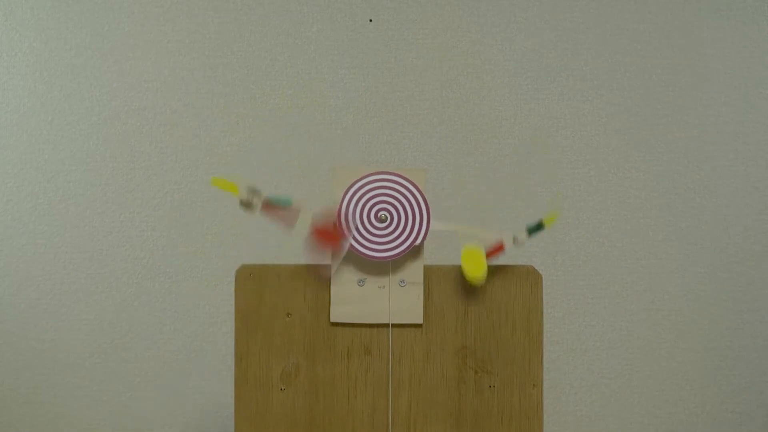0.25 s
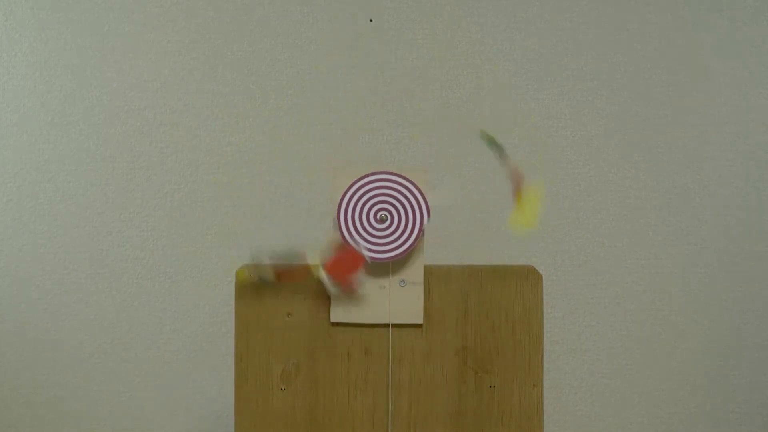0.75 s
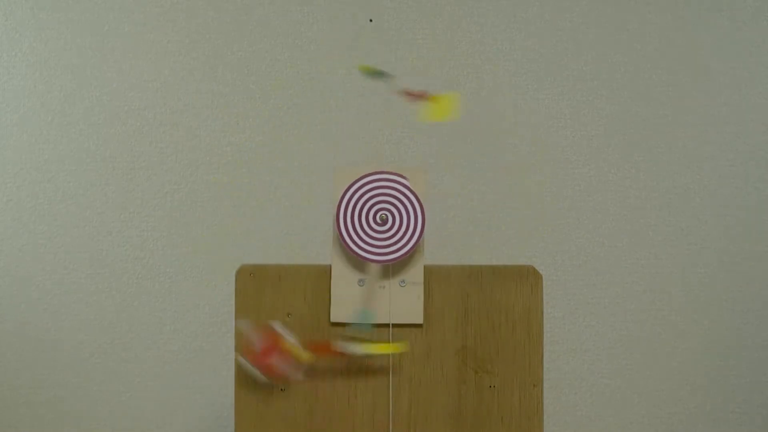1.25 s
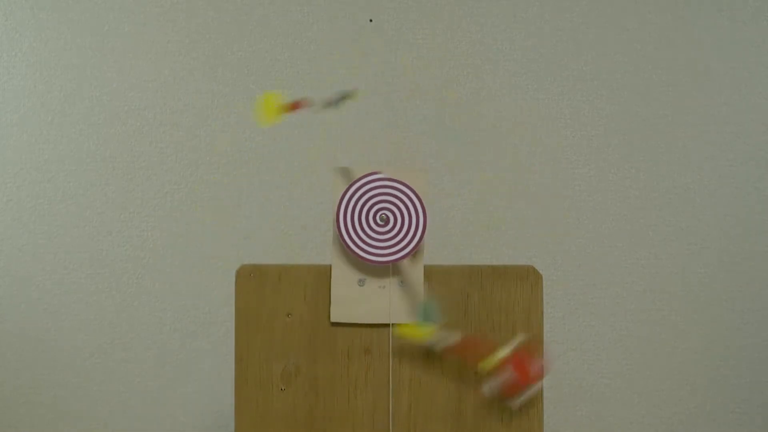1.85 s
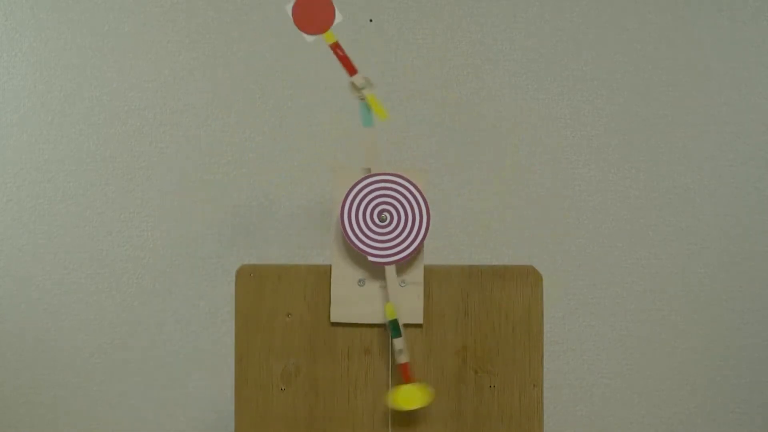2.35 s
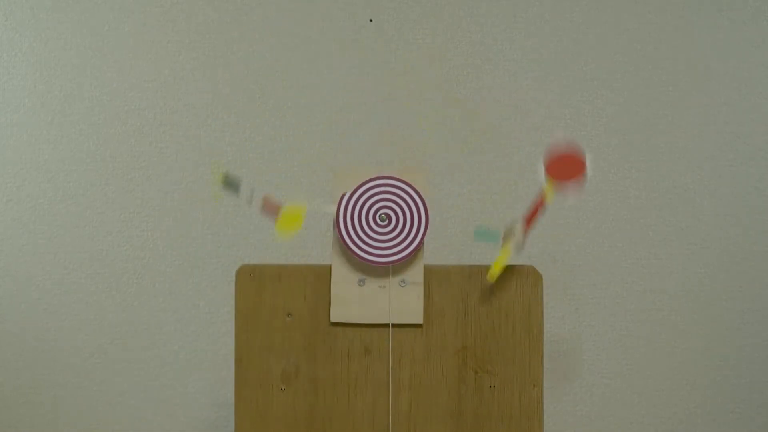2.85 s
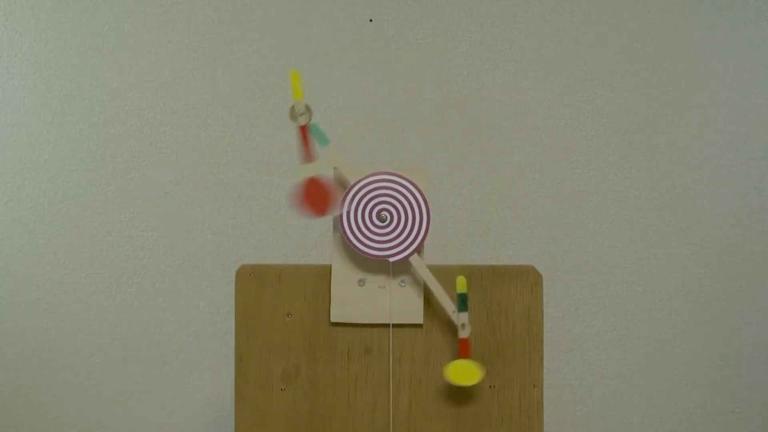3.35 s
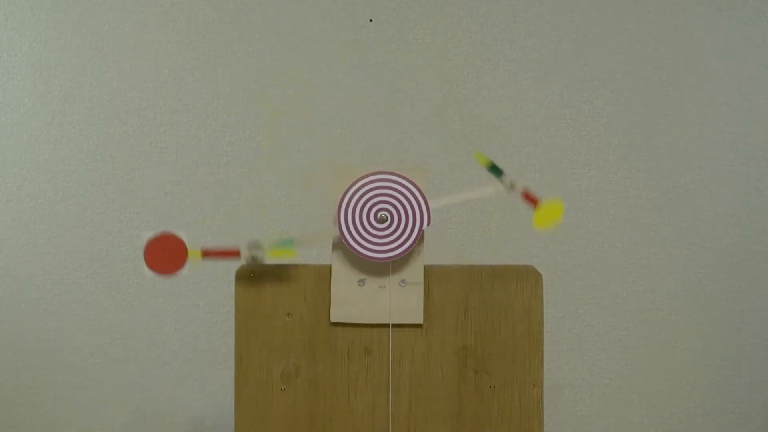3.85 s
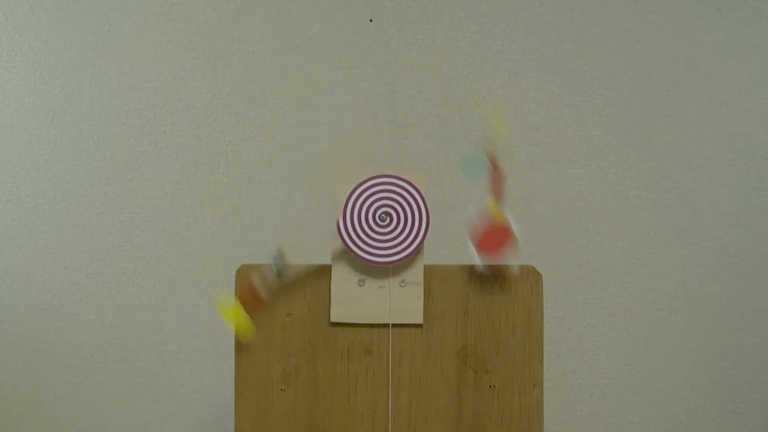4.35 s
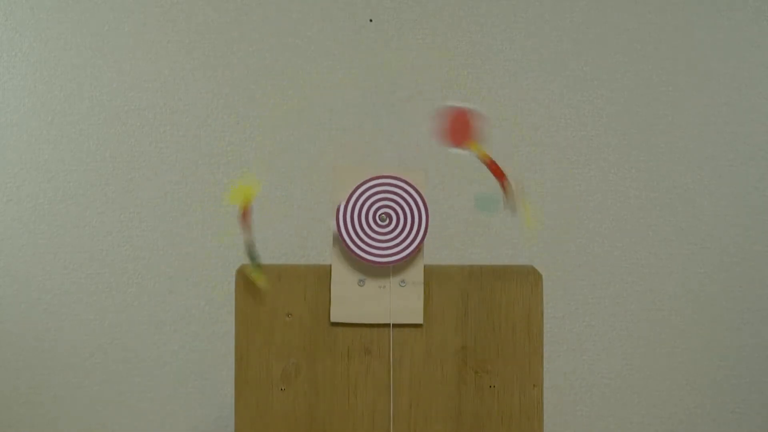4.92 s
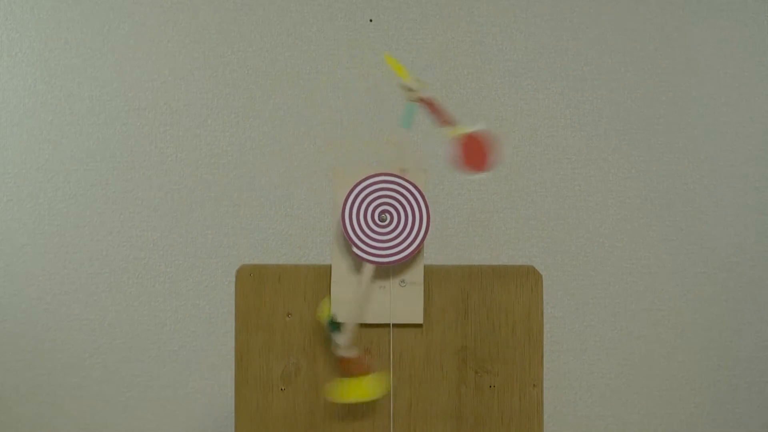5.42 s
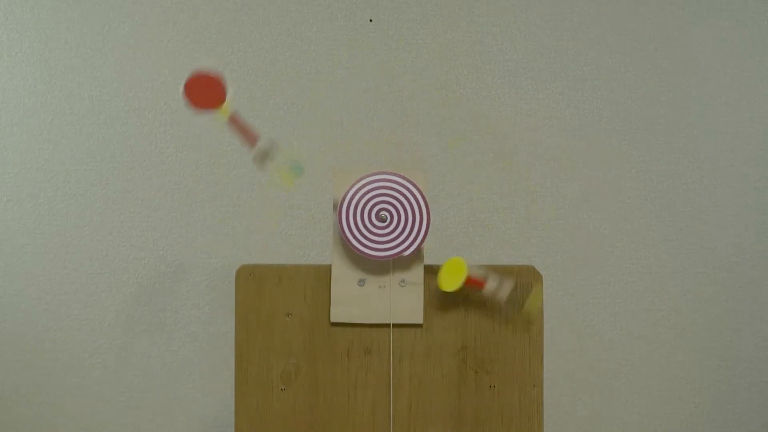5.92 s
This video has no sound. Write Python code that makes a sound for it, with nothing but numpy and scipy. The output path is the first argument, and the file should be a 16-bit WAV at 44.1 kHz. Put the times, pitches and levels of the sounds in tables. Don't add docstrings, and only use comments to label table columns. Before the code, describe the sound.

Loose wooden pivots of a swinging double-pendulum sculpture clack and knock irregularly in a small room, with bright bearing ticks over faint steady hiss.

```python
import sys
import numpy as np
from scipy import signal
from scipy.fft import rfft, irfft, next_fast_len
from scipy.io import wavfile
from scipy.ndimage import uniform_filter1d

SR = 44100
rng = np.random.default_rng(int(sys.argv[2]) if len(sys.argv) > 2 else 0)


def ratio_of_db(decibels):
    return 10 ** (np.asarray(decibels, float) / 20)


def store_pcm(level_fs):
    pcm = np.round(np.clip(level_fs, -1, 1) * 32767).astype(np.int16)
    wavfile.write(sys.argv[1], SR, np.atleast_2d(pcm).T)


N = 272528
SPAN = SR // 3
TIME = np.arange(SPAN // 2) / SR


def unit(x):
    return x / np.sqrt(np.mean(x ** 2) + 1e-20)


def peaked(x):
    return x / np.max(np.abs(x))


def along(points, hz):
    f, v = np.transpose(points)
    return np.interp(np.log(hz + 1), np.log(f + 1), v)


def filtered(x, response):
    m = next_fast_len(N + SR // 2)
    return irfft(rfft(x, m) * response(np.fft.rfftfreq(m, 1 / SR)), m)[..., :N]


def band(x, lo_hz, hi_hz, order=3):
    sos = signal.butter(order, [lo_hz, min(hi_hz, .45 * SR)], "band", fs=SR, output="sos")
    return signal.sosfilt(sos, x)


def add(track, s, sound):
    track[:, round(s * SR):][:, :SPAN] += sound


def build_up(rise_s):
    return 1 - np.exp(-TIME / rise_s)


def ring(modes, scatter_db):
    hz, db, t60 = np.transpose(modes)[..., None]
    strength, detune, phase = rng.standard_normal((3, len(modes), 1))
    waves = np.sin(2 * np.pi * (hz * (1 + 0.0055 * detune) * TIME + phase))
    decay = ratio_of_db(db + scatter_db * strength - 60 * TIME / t60)
    return np.sum(decay * waves, 0) * build_up(0.00013)


def burst(rise_s, lo_hz, hi_hz):
    u = TIME / rise_s
    noise, grain = rng.standard_normal((2, len(u)))
    return u * np.exp(1 - u) * unit(band(noise * ratio_of_db(5.34 * grain), lo_hz, hi_hz))


def chatter(spread_s, count):
    touches = np.zeros(SR // 20)
    delays = spread_s * rng.gamma(2, .5, count) * SR
    places = np.minimum(delays, len(touches) - 1).astype(int)
    touches[places] = rng.standard_normal(count)
    touches[0] = 0.84
    return touches / np.linalg.norm(touches)


def ring_arms(contact_hz):
    # (frequency [Hz], level [dB], T60 [s])
    arm_modes = [(1950, -6, .02), (2190, -2, .05), (2500, -4, .02), (2720, -2, .03), (2870, -1, .04),
                 (3030, -2, .035), (3208, 0, .055), (3540, -5, .02), (3935, -5, .02), (4290, -5, .02),
                 (4700, -9, .02)]
    near = [(hz, db - 18 * abs(np.log2(hz / contact_hz)), t60) for hz, db, t60 in arm_modes]
    driven = signal.fftconvolve(ring(near, 2.8), chatter(.005, count=8))
    return peaked(band(driven[:len(TIME)], 2260, 4940))


def ring_long_arm():
    # (frequency [Hz], level [dB], T60 [s])
    long_modes = [(1235, -9, .04), (1378, -8, .04), (1535, -4, .03), (1565, 0, .05), (1680, -5, .03)]
    return peaked(ring(long_modes, 1.0) * build_up(0.001) ** 2)


def ring_stand():
    # (frequency [Hz], level [dB], T60 [s])
    stand_modes = [(415.5, -4, 0.067), (453.6, 0.5, 0.036), (532, 4.5, 0.073), (613.8, -12, 0.15),
                   (837.6, -7.5, 0.079), (977, -14.5, 0.069)]
    return peaked(ring(stand_modes, 0.95) * build_up(0.0045) ** 2)


def knocks():
    # (time [s], arm clack [dB], stand [dB rel], scrape [dB rel])
    hub_knocks = [(.0277, -27, -5, -9.5), (.6144, -35, -7, -6), (.7806, -30.5, -2.5, -6),
                  (.9349, -20.5, 0, -4.5), (1.2609, -23.5, -11.5, -6), (1.68, -42.5, 5, -23),
                  (1.9111, -29.5, -2.5, 2.5), (1.992, -43, -11, -6), (2.0726, -39.5, 6, 6),
                  (2.3288, -48.5, 0, -16), (2.578, -41.5, -5, -12), (3.015, -35.5, -7, 0),
                  (3.887, -38, -14, 0), (3.9036, -28.5, -23, -4), (4.3616, -44, 10.5, -2),
                  (4.517, -33, -5.5, -3), (4.8735, -35.5, -5.5, -20), (5.0648, -39.5, -13, -10),
                  (5.4016, -34, -3.5, -5), (5.433, -42, 5.5, -16), (5.4742, -38, -5.5, -24),
                  (5.5149, -43, -8, -19), (5.7264, -34, -5, 0)]
    # (time [s], arm clack [dB], stand [dB rel], scrape [dB rel])
    heavy_knocks = [(.0894, -26.5, -21, -0.5), (.6935, -29.5, 1, -2), (.7249, -20.5, -14.5, -32),
                    (.9247, -24, -9, 1), (1.3814, -24, -7.5, -5.5), (2.0378, -30.5, -8.5, -5.5),
                    (3.1338, -32.5, -11, -9), (3.182, -44.5, 11, 8.5), (3.4111, -37.5, -19, -7),
                    (3.87, -30.5, 0.5, 2.5), (4.3314, -33.5, 9.5, -2), (4.4274, -33, -5, -24),
                    (4.6134, -25, -6, -5.5), (5.1024, -34, 6, -0.5), (5.2205, -21.5, -9, -5.5),
                    (5.874, -26.5, -4.5, -6.5)]
    # (time [s], arm clack [dB], stand [dB rel], scrape [dB rel])
    light_knocks = [(.0747, -37, -14, 3), (.5609, -27.5, 1, -10), (.5865, -31.5, -14, -9),
                    (.8044, -28.5, 5.5, -9), (.8449, -29.5, -19, -10), (1.2221, -46, 11.5, -12),
                    (1.5181, -25, -10, -2.5), (1.5544, -54, -9, -16), (2.1547, -28.5, -11, -10),
                    (3.2622, -31, -7, -8.5), (3.9298, -35, -5.5, 0), (4.415, -26, -9, -37),
                    (4.7976, -20, -2.5, -24), (5.3274, -27.5, -6, -14), (5.3594, -33.5, -13, -7),
                    (5.8413, -35, -3.5, -25), (5.9666, -27, -11.5, -24)]
    # (time [s], arm clack [dB], stand
    # [dB rel], scrape [dB rel])
    tip_knocks = [(.0618, -29, -25, -8), (.4617, -12.5, -11, -12.5), (4.2956, -35, 10.5, -13),
                  (4.3043, -16.5, -7, -11), (4.5543, -28.5, -14.5, -8), (4.7171, -25.5, -12.5, -25),
                  (4.7546, -37, -26, -19)]
    # (knocks, clack centre [Hz], long arm [dB rel])
    pivots = [(hub_knocks, 2170, 0.25), (heavy_knocks, 2380, 0.22),
              (light_knocks, 2930, -0.82), (tip_knocks, 3170, -3.5)]
    track = np.zeros((2, N + SPAN))
    for rows, hz, long_db in pivots:
        for s, db, stand_db, scrape_db in rows:
            carried_db = 0.45 * stand_db
            clack = ratio_of_db(-9.5) * burst(0.0036, hz * 0.66, hz * 1.43)
            clack += ratio_of_db(-15.5 + carried_db) * burst(0.0096, 636, 2140)
            scrape = (burst(0.0014, 4850, 6060) + burst(0.0018, 6120, 7830)) / 2
            upper = ratio_of_db(-6.0) * ring_arms(hz) + clack + ratio_of_db(scrape_db - 5) * scrape
            upper += ratio_of_db(long_db + carried_db) * ring_long_arm()
            push = ratio_of_db(stand_db - 21.5) * burst(0.0043, 167.5, 255)
            lower = ratio_of_db(stand_db - 0.5) * ring_stand() + push
            add(track, s, ratio_of_db(db) * heard(upper, room_db=0.0))
            add(track, s, ratio_of_db(db) * heard(lower, room_db=0.0))
    return track[:, :N]


def ticks():
    # (time [s], level [dB], frequency [Hz], air [dB rel])
    bearing_ticks = [(0.0597, -14.5, 6720, -23), (0.693, -25, 5830, -25), (0.7244, -13.5, 5320, -47),
                     (0.9359, -14.5, 5400, -11.5), (2.5785, -27, 6040, -13), (3.4101, -29.5, 5850, -20),
                     (3.872, -29, 5900, -12), (3.9035, -26, 5740, -16), (4.2959, -13.5, 6100, -29),
                     (4.3314, -18, 6350, -21), (4.362, -21.5, 6100, -24), (4.3874, -25.5, 6160, -31),
                     (4.517, -31, 6900, -34), (4.7968, -20.5, 5960, -38), (5.5139, -37.5, 5640, -22),
                     (5.8406, -33, 5600, -25)]
    # (time [s], level [dB], frequency [Hz], air [dB rel], T60 [s])
    washer_ticks = [(2.578, -27, 2300, -40, .008), (2.5795, -38, 8640, -40, .04),
                    (2.582, -25, 2600, -40, .008), (2.582, -37, 3500, -40, .07),
                    (2.582, -31, 6300, -30, .03), (3.872, -29, 5740, -40, .07),
                    (3.904, -32, 5740, -40, .08), (4.72, -27, 2800, -40, .08)]
    bearing_t60_s = .009
    track = np.zeros((2, N + SPAN))
    for s, db, hz, air_db, t60 in [(*row, bearing_t60_s) for row in bearing_ticks] + washer_ticks:
        snap = ratio_of_db(-9.5) * (ring([(hz, 0, t60)], 0) + burst(0.0005, hz * 0.64, hz * 1.23))
        air = ratio_of_db(air_db - 9.5) * burst(0.0017, 8600, 13300)
        add(track, s, ratio_of_db(db) * heard(snap + air, room_db=0.5))
    return track[:, :N]


def thumps():
    # (time [s], thump level [dB])
    table_jolts = [
        (0.462, -68),
        (0.804, -32),
        (0.932, -25.5),
        (3.865, -27),
        (4.304, -21),
        (4.331, -18.5),
    ]
    # (frequency [Hz], level [dB], T60 [s])
    table_modes = [(115, -9, .15), (155, 0, .12), (185, 0, .1), (227, 2, .15), (290, -3, .08)]
    track = np.zeros((2, N + SPAN))
    for s, db in table_jolts:
        thump = ratio_of_db(-24) * ring(table_modes, 0.81) + ratio_of_db(-28.5) * burst(0.014, 156, 350)
        add(track, s, ratio_of_db(db) * heard(build_up(0.0082) * thump, room_db=5.5))
    return track[:, :N]


def hollow_notes():
    # (time [s], level [dB])
    hollow_hits = [
        (4.298, -22),
    ]
    # (frequency [Hz], level [dB], T60 [s])
    hollow_modes = [(717, 0, .32), (660, -12, .1), (775, -12, .1), (905, -7, .08), (1097, -5, .06)]
    track = np.zeros((2, N + SPAN))
    for s, db in hollow_hits:
        note = build_up(0.0057) * ring(hollow_modes, 0.65) + ratio_of_db(-19) * burst(0.0033, 950, 1080)
        add(track, s, ratio_of_db(db) * heard(note, room_db=6))
    return track[:, :N]


def heard(x, room_db):
    # (frequency [Hz], T60 [s])
    room_decay = [(200, 0.46), (600, 0.21), (2000, 0.23), (5000, 0.26), (12000, 0.24)]
    # (frequency [Hz], side minus mid [dB])
    tail_width = [(150, -61), (600, -16), (2000, -8.5), (9000, -9)]
    # (delay [s], level [dB])
    early_echoes = [
        (.0065, -9.5),
        (.0085, -12.5),
    ]
    hz, t, z = signal.stft(rng.standard_normal((2, SPAN)), SR, nperseg=256)
    decay = ratio_of_db(-60 * t / along(room_decay, hz)[:, None])
    z = z * decay * ratio_of_db([0 * hz, along(tail_width, hz)])[..., None]
    mid, side = signal.istft(z, SR, nperseg=256)[1][:, :SPAN]
    rise = 1 - np.exp(-np.arange(SPAN) / SR / .003)
    tail = rise * np.array([mid + side, mid - side])
    response = ratio_of_db(room_db) * tail / np.linalg.norm(tail[0])
    response[:, 0] += 1
    for delay, db in early_echoes:
        response[:, round(delay * SR * rng.uniform(.9, 1.1))] += ratio_of_db(db)
    return signal.fftconvolve(x[None], response, axes=1)[:, :SPAN]


def hiss():
    # (frequency [Hz], density [dB per Hz])
    hiss_colour = [(20, -8), (62, -14.5), (120, -11), (200, -3.5), (310, -2.5), (500, 1.5), (800, 1.5),
                   (1600, 0), (2600, -3), (5000, -8.5), (8000, -12.5), (13000, -19), (14800, -18.5),
                   (16000, -27)]
    # (frequency [Hz], likeness [-1 to 1])
    hiss_likeness = [(60, 1), (290, 0.89), (640, 0.65), (3000, 0.56), (7000, 0.65), (11000, 0.98),
                     (15000, 0.97)]
    # (time [s], level [dB])
    hiss_drift = [(0, -46.5), (1, -47), (2, -49), (3, -50), (4, -49.5), (5, -48), (6.2, -49)]

    def mid_side(hz):
        angle = np.arccos(np.clip(along(hiss_likeness, hz), -1, 1)) / 2
        return ratio_of_db(along(hiss_colour, hz)) * [np.cos(angle), np.sin(angle)]

    z = signal.stft(rng.standard_normal((2, N)), nperseg=512)[2]
    patches = uniform_filter1d(rng.standard_normal(z.shape[1:]), 6, 0)
    patches = unit(uniform_filter1d(patches, 14, 1))
    pair = signal.istft(z * ratio_of_db(0.32 * patches), nperseg=512)[1][:, :N]
    mid, side = filtered(pair, mid_side)
    level_db = np.interp(np.arange(N) / SR, *np.transpose(hiss_drift))
    return ratio_of_db(level_db + [[.3], [-.3]]) * unit(np.array([mid + side, mid - side]))


def scene():
    # (frequency [Hz], left minus right [dB])
    stereo_lean = [(100, -0.5), (500, 1), (1500, 3), (3000, 2), (6000, 0.5), (12000, 0)]

    def lean(hz):
        return ratio_of_db(along(stereo_lean, hz) * [[.5], [-.5]])

    return filtered(knocks() + ticks() + thumps() + hollow_notes(), lean) + hiss()


def roll_off(x):
    return signal.sosfilt(signal.butter(12, 16500, fs=SR, output="sos"), x)


def record(dry):
    high_pass = signal.butter(2, 70, "high", fs=SR, output="sos")
    mix = filtered(signal.sosfilt(high_pass, dry), lambda hz: hz < 15800)
    return roll_off(mix)


dry = scene()
out = record(dry)
store_pcm(out)
```